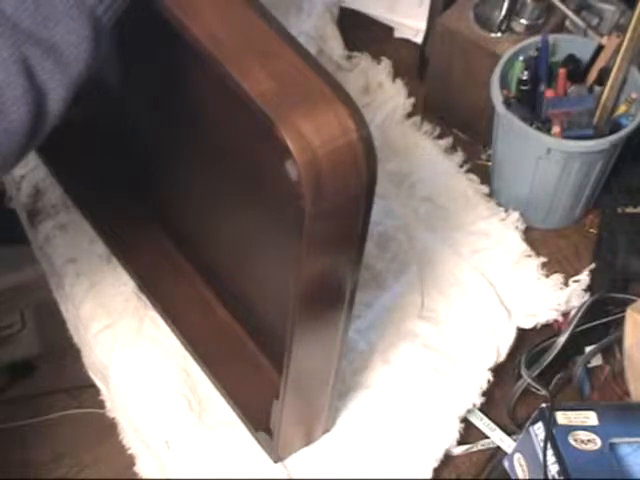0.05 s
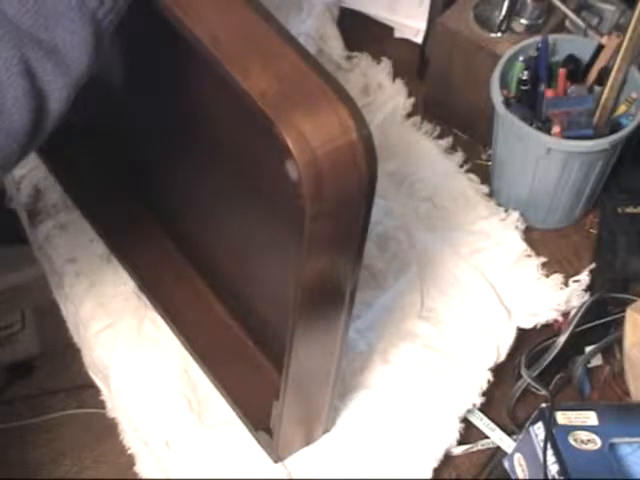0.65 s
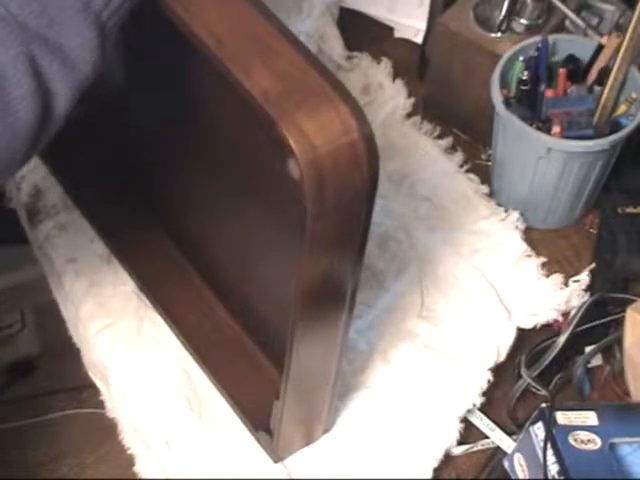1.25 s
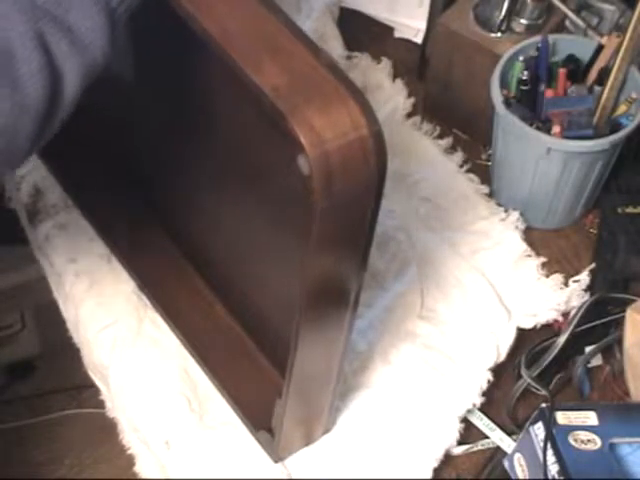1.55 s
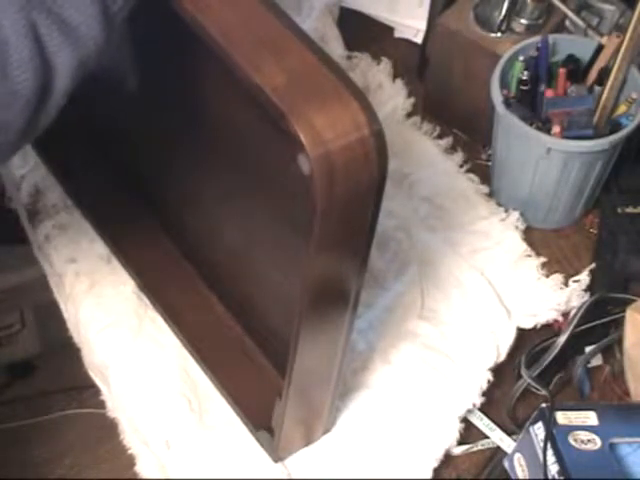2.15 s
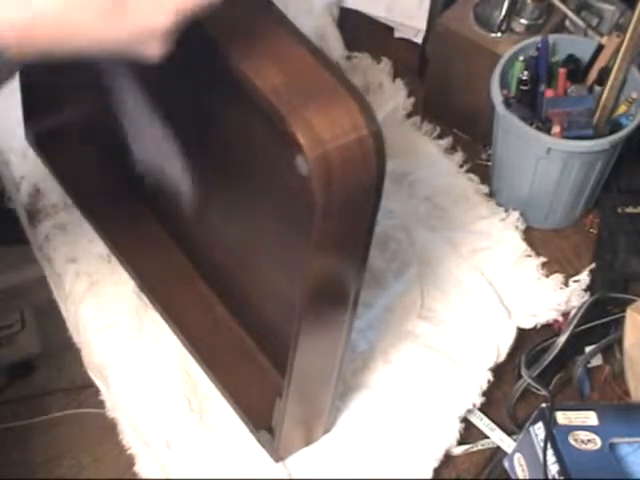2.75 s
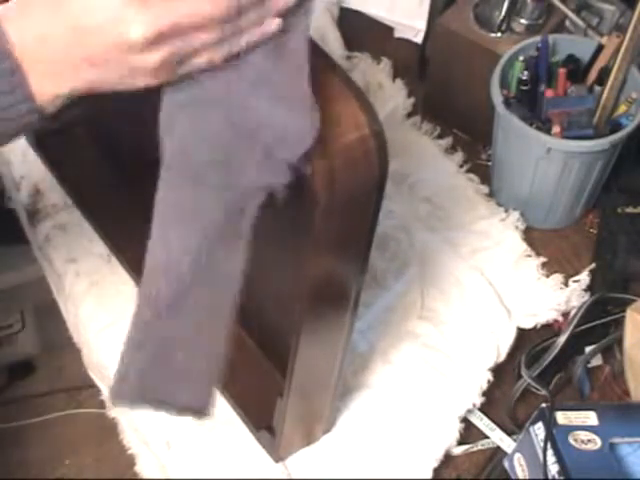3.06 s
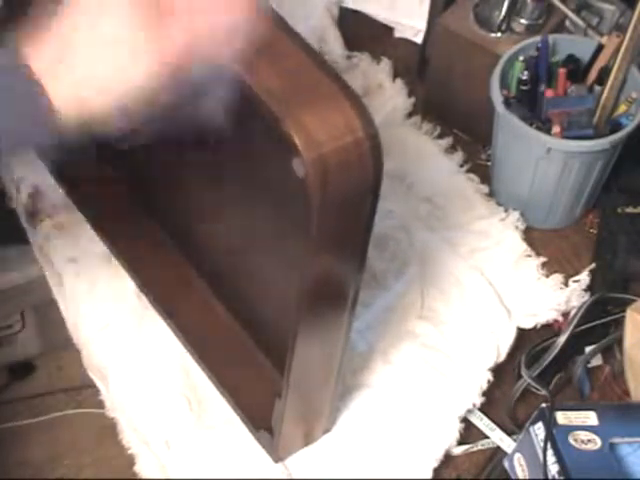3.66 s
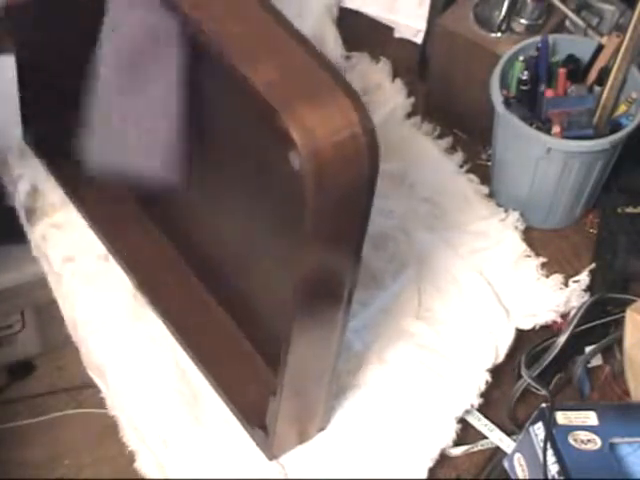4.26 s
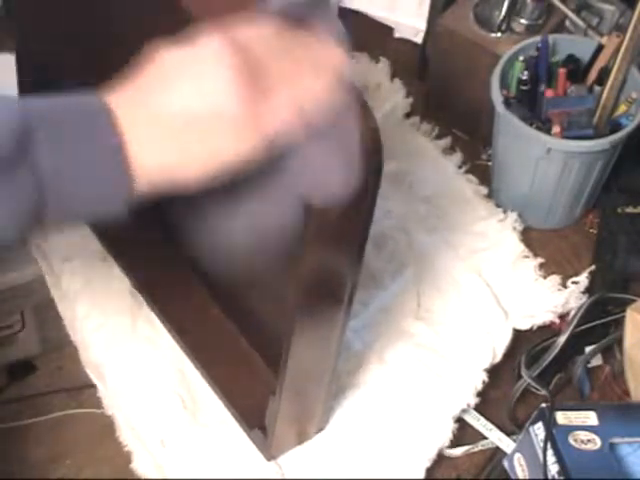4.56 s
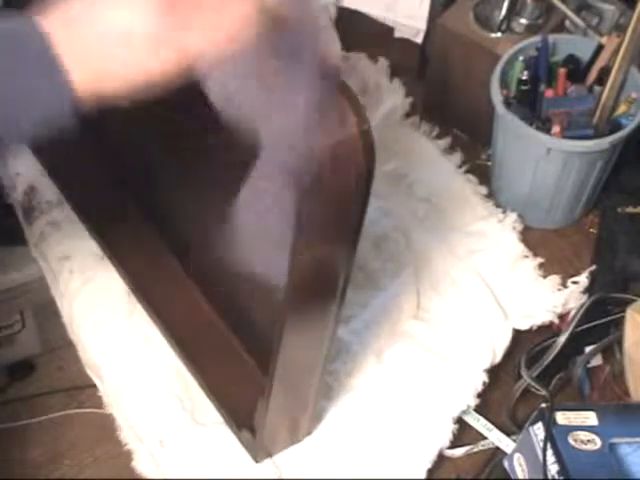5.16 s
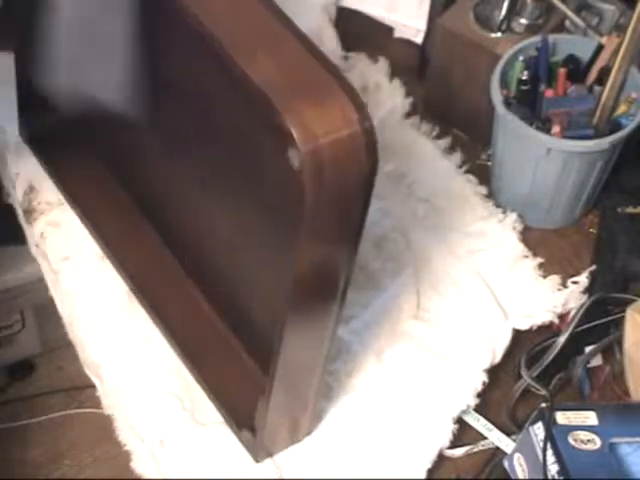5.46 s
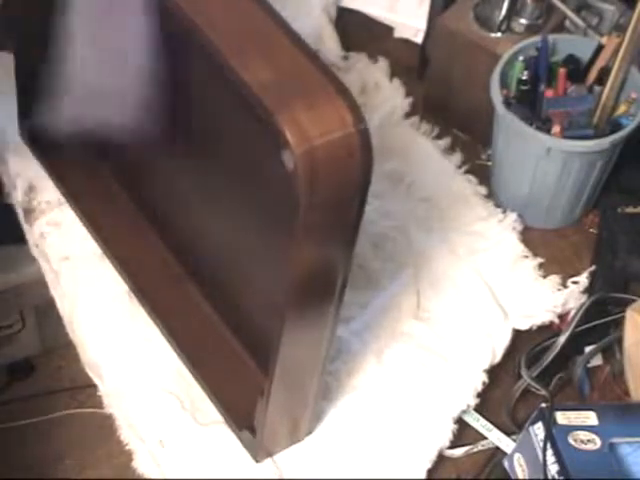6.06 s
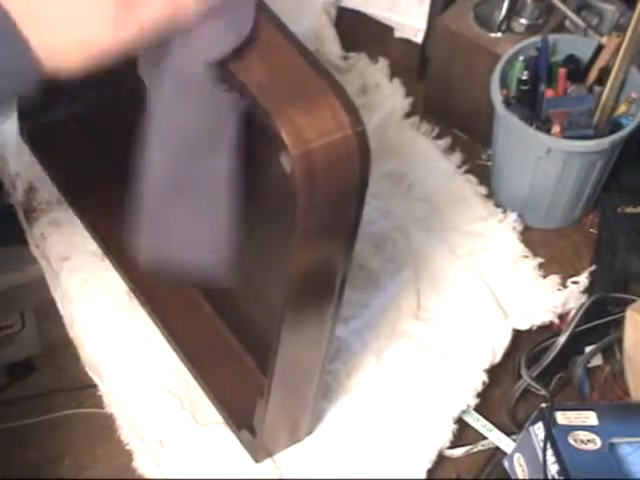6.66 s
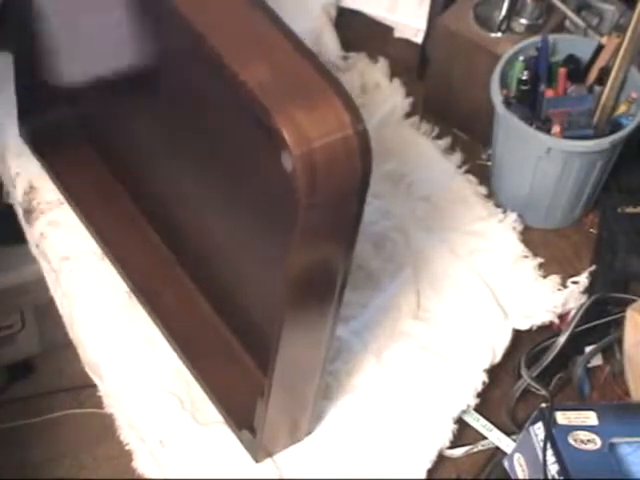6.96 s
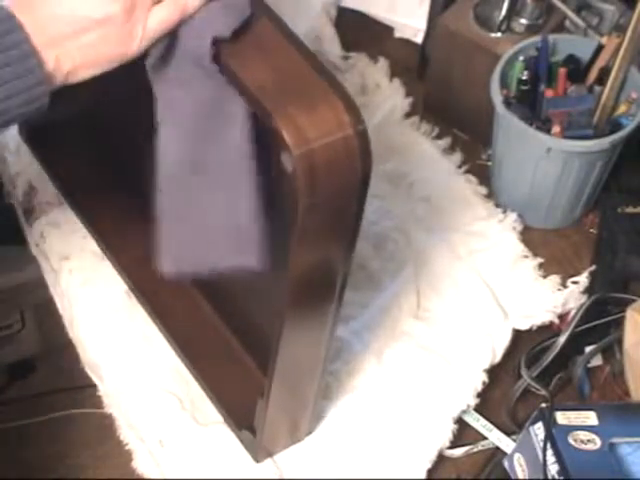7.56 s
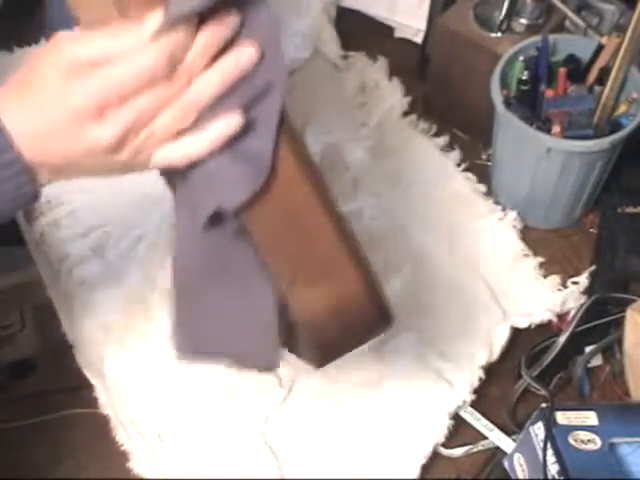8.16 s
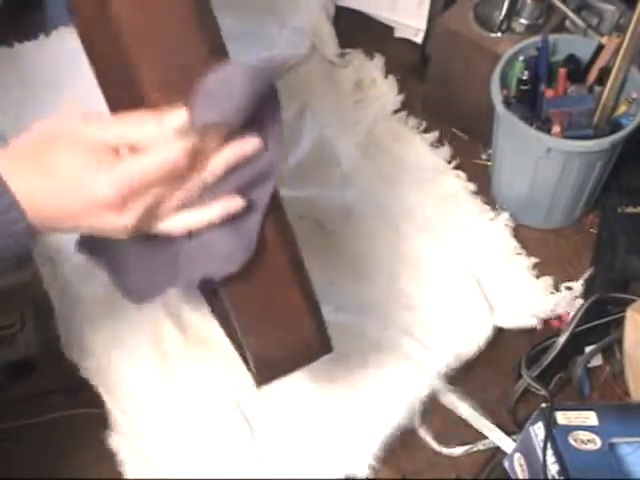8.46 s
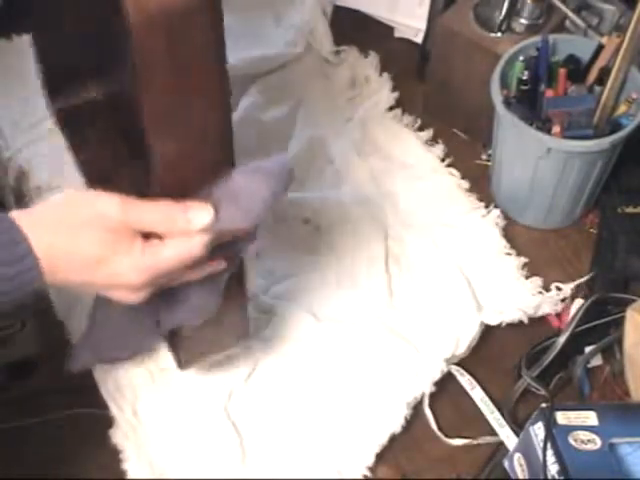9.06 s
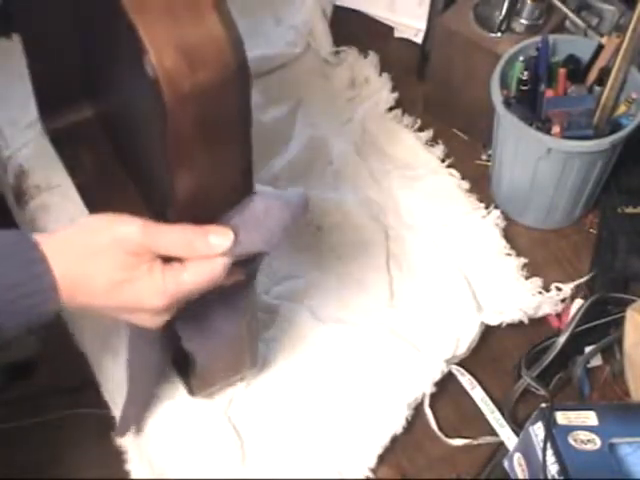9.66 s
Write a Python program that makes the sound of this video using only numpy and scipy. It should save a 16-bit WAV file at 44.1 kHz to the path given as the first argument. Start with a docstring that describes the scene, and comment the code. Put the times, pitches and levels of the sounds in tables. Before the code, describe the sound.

In a small workshop with a steady low motor hum, polish is sprayed twice close to the microphone. A wooden case knocks, then quiet, slightly squeaky cloth strokes rub its varnish. One heavy padded thud comes midway through the wiping. Near the end a short scrape leads to two more thuds, each leaving a deep fading rumble as the microphone stand shakes, and the soft wiping resumes.

```python
"""Polishing a wooden cabinet.

On a cloth-covered workbench, a pump nozzle squirts polish twice and a rag wipes to and fro, squeaking.
The case rings under light knocks, scrapes as it is tipped and lands in three heavy thuds.
Each thud sets the microphone stand swaying; thin, high tones flicker just after the second.
A motor hums underneath, in a small workshop."""
import sys
import numpy as np
from scipy import signal
from scipy.fft import rfft, irfft, next_fast_len
from scipy.io import wavfile

SR = 44100
rng = np.random.default_rng(int(sys.argv[2]) if len(sys.argv) > 2 else 0)


def put_to_file(sound):
    """Save the sound as 16-bit audio at rate SR, in the file named by the first command-line argument."""
    columns = np.atleast_2d(sound).T  # one column per channel
    safe = np.clip(columns, -1, 1)
    whole_steps = np.round(safe * 32767)
    wavfile.write(sys.argv[1], SR, whole_steps.astype(np.int16))


N = 436590
TIME = np.arange(N) / SR

# motor partials: f/Hz, rms level/dB
MOTOR_PARTIALS = [(75.1, -42.5), (179.5, -55.5), (300, -66), (377, -67.5), (528, -74.5), (744, -73),
                  (797, -82)]
# room noise spectra: f/Hz, relative level/dB
RUMBLE_SPECTRUM = [(15, -12), (29, 2), (42, -0.5), (70, -7), (110, -8), (170, -11), (240, -15.5),
                   (330, -38.5)]
AIR_SPECTRUM = [(260, -0.5), (380, 0.5), (520, -9), (760, -8.5), (1000, -10), (1500, -13.5), (3000, -17),
                (5000, -18.5), (8500, -29), (12000, -25.5), (15500, -24)]
# wiping arm rocks the stand: t/s, sway/dB
ARM_NUDGES = [(3.198, -41), (4.249, -31), (6.299, -41.5), (7.298, -37.5)]
# thin, high flickering tones: centre t/s, f/Hz, level/dB, length/s
FLICKER_TONES = [(8.51, 11700, -52.5, 0.082), (8.545, 12400, -53, 0.031), (8.588, 4000, -48, 0.036),
                 (8.597, 11500, -56, .018), (8.604, 2850, -44, .022), (8.662, 5300, -53.5, 0.017)]
# cloth friction spectrum: f/Hz, relative level/dB
RAG_SPECTRUM = [(150, 12), (400, -1.5), (800, -3), (1250, -2), (2200, -0.5), (2900, -3), (4200, -3),
                (6000, -2), (7500, -6), (9000, -15), (12000, -11), (16000, -21)]
# rag strokes: t/s, length/s, level/dB, share of stroke before top speed
RAG_STROKES = [(3.2, 0.44, -59, 0.6), (3.612, 0.21, -50.5, 0.78), (4.094, 0.27, -54.5, 0.4),
               (4.295, 0.52, -51.5, 0.33), (5.076, 0.58, -51, 0), (5.599, 0.38, -52.5, 0),
               (5.907, 0.22, -51.5, 0.44), (6.078, 0.2, -52.5, .75), (6.288, 0.41, -53, 0.03),
               (6.7, 0.37, -51, 0.6), (7.04, 0.51, -53, 0.4), (7.59, 0.095, -55.5, 0.64),
               (7.762, 0.35, -52, 0.2), (9.23, 0.47, -59, 0), (9.615, 0.47, -54.5, .75)]
# varnish squeaks: f/Hz, width/Hz, level/dB re rub
VARNISH_SQUEAKS = [(1262, 35, -15.5), (2910, 260, -11.5)]
# rag catches, lower squeak swells: t/s, swell/dB
RAG_CATCHES = [(3.74, 6), (5.66, 12), (6.49, 5), (7.22, 11), (7.32, 11)]
# nozzle tones: f/Hz, level/dB
NOZZLE_TONES = [(4000, -43), (5950, -40)]
# spray pulses: full flow t/s, rise/s, hold/s, fall/(dB/s), shut-off/s, mist/dB, spatter/dB
SPRAY_PULSES = [(.482, 0.0013, 0.11, 115, 0.01, -27.5, -33.5),
                (0.69, 0.0026, 0.068, 10, 0.0092, -42, -47.5),
                (0.73, 0.0071, 0.0082, 198, 0.0055, -37, -28)]
# fine and coarse drop spectra: f/Hz, relative level/dB
MIST_SPECTRUM = [(1000, -27), (3000, -27), (5000, -2.5), (6900, 4.5), (7900, -3), (9800, -0.5), (11000, -2),
                 (13000, -12), (16000, -26)]
SPATTER_SPECTRUM = [(100, -13), (250, -0.5), (900, 3), (1800, 1.5), (3000, 0), (5000, -13), (9000, -22)]
# resonances of the dragged case: f/Hz, width/Hz, relative level/dB
SCRAPE_MODES = [(414, 39, 12), (356, 100, 7), (680, 210, -1.5), (1370, 720, -11.5), (2450, 480, -15)]
# hard contacts and spitting drops: t/s, peak/dB, centre f/Hz
DRY_CLICKS = [(.487, -13, 6400), (.497, -14.5, 6500), (.668, -34, 5000), (.906, -39, 2940),
              (4.0494, -29, 1930)]
# case modes: f/Hz, relative level/dB, t60/s
WOOD_MODES = [(65, -22, 0.42), (117.3, 0, 0.26), (159, -0.5, 0.084), (203, 11, 0.089), (244, 5, 0.046),
              (329.5, -7.5, 0.093), (373.5, 4, 0.096), (433, -12.5, 0.08), (530, -30, 0.11),
              (600, -14, 0.084), (731, -6.5, 0.054), (771, -10, 0.092), (876, -2, 0.054), (1128, 0, 0.05),
              (1177, -25, .13), (1338, -21.5, 0.13), (1420, -12, 0.057), (1626, -14, 0.13),
              (2110, -31, 0.099)]
# dense panel modes, room included: f/Hz, relative spectral density/dB, t60/s
PANEL_SPECTRUM = [(149, 23, 0.25), (390, 10, 0.15), (720, 0.5, 0.11), (1360, -1.5, 0.24), (2550, -7, 0.24),
                  (4130, -6.5, 0.43), (6960, -6, 0.46), (12000, -15, 0.22), (15900, -15.5, 0.35)]
# light knocks of hand and case: t/s, level/dB, low cut/Hz, high cut/Hz
LIGHT_KNOCKS = [(.653, -48.5, 249, 5000), (.676, -35, 247, 4000), (1.7414, -18.5, 85, 450),
                (1.743, -32.5, 616, 2250), (1.754, -23.5, 192, 716), (1.885, -49.5, 1600, 1250),
                (1.894, -41, 130, 168), (2.003, -46.5, 139, 302), (2.446, -49, 960, 6400),
                (2.453, -45, 189, 240), (3.256, -48.5, 150, 280), (3.398, -54.5, 950, 1210),
                (3.930, -46, 503, 564), (4.056, -30.5, 119, 258), (4.061, -35, 402, 490),
                (4.201, -51.5, 398, 1200), (4.366, -43, 60, 109), (4.703, -39, 960, 1090),
                (4.712, -42, 525, 547), (5.926, -46.5, 865, 1800), (6.339, -44.5, 129, 406),
                (6.791, -38, 356, 377), (8.003, -41, 400, 1400), (8.200, -44.5, 500, 2000)]
# edge touch, strike, rebound per landing: delay/s, level/dB re strike, low cut/Hz, high cut ratio
LANDING_CONTACTS = [(.003, -9.5, 260, 0.89), (.0095, 0.5, 217, 1), (.022, -7.5, 270, .8)]
# case lands on padding: t/s, bounce/dB, bounce f/Hz, strike/dB, strike high cut/Hz, crack/dB, sway/dB
CASE_LANDINGS = [(5.174, -2, 124, -15, 1900, -8.5, -21.5), (8.431, -2.5, 125, -14.5, 1850, -12, -24),
                 (9.2966, -1, 158, -14.5, 1597, -12, -27.5)]


def undb(db):
    """Decibels to gain."""
    return 10 ** (np.asarray(db) / 20)


def unit(x):
    """Scale to rms 1."""
    return x / np.sqrt(np.mean(x ** 2))


def add(track, at_s, sound):
    """Mix a sound in from at_s."""
    i = int(at_s * SR)
    track[i:i + len(sound)] += sound[:N - i]


def noise(spectrum, grain_db=0):
    """Coloured noise, rms 1; grain makes single particles stand out."""
    hz, db = np.transpose(spectrum)
    size = next_fast_len(N)
    f = np.maximum(np.fft.rfftfreq(size, 1 / SR), 1)
    gain = undb(np.interp(np.log(f), np.log(hz), db)) * np.minimum(f / hz[0], 1) ** 2
    particles = rng.standard_normal(size) * undb(grain_db * np.minimum(rng.standard_normal(size), 3))
    return unit(irfft(rfft(particles) * gain, size)[:N])


def wander(rate_hz):
    """Interpolated random values, spread near 1."""
    knots = rng.standard_normal(N // 20)
    return np.interp(TIME * rate_hz, np.arange(len(knots)), knots)


def cut(x, hz, kind, order=2):
    """Butterworth low-, high- or band-pass."""
    sos = signal.butter(order, np.clip(hz, 10, SR / 2 - 500), kind, fs=SR, output="sos")
    return signal.sosfilt(sos, x)


def resonate(x, hz, width_hz):
    """Two equal resonators in series, gain 1 at centre."""
    b, a = signal.iirpeak(hz, hz / width_hz, fs=SR)
    return signal.lfilter(b, a, signal.lfilter(b, a, x))


def fade(t, t60_s):
    """Exponential decay."""
    return np.exp(-np.log(1000) * t / t60_s)


def workshop(rumble_db=-48.5, air_db=-56.5, waver_db=1.0):
    """Motor hum over low rumble and faint hiss."""
    hum = np.zeros(N)
    for hz, db in MOTOR_PARTIALS:
        amplitude = np.sqrt(2) * undb(db + waver_db * wander(2.7))
        hum += amplitude * np.sin(2 * np.pi * (hz * TIME + rng.random()))
    return hum + undb(rumble_db) * noise(RUMBLE_SPECTRUM) + undb(air_db) * noise(AIR_SPECTRUM)


def room(x, wet_db=-15, t60_s=0.28, band_hz=(250, 7000)):
    """Add the short reflections of a cluttered room."""
    t = TIME[:SR // 2]
    tail = cut(rng.standard_normal(len(t)), band_hz, "bandpass", order=1) * fade(t, t60_s) * (t > .008)
    return x + undb(wet_db) * signal.fftconvolve(x, tail / np.linalg.norm(tail))[:N]


def stand(sway_hz=28.93, build_s=0.31, t60_s=1.37):
    """The bench feeds the stand's wobble, which builds and dies away."""
    out, t = np.zeros(N), TIME[:2 * SR]
    swell = (1 - np.exp(-t / build_s)) ** 2 * fade(t, t60_s)
    sway = swell / swell.max() * np.sin(2 * np.pi * sway_hz * t)
    for at_s, *_, db in CASE_LANDINGS + ARM_NUDGES:
        add(out, at_s, undb(db) * sway)
    return out


def flicker(half_width=0.11):
    """Thin, high tones flicker just after the second thud, each a narrow noise band."""
    out = np.zeros(N)
    for at_s, hz, db, length_s in FLICKER_TONES:
        size = int(length_s * SR)
        band_hz = [hz * (1 - half_width), hz * (1 + half_width)]
        tone = cut(rng.standard_normal(SR // 2), band_hz, "bandpass")[-size:]
        add(out, at_s - length_s / 2, undb(db) * unit(tone) * np.hanning(size))
    return out


def wiping_gain(creep_db=-64, speed_power=.55):
    """Gain follows hand speed; until the second landing the rag also creeps between strokes."""
    creep_in = np.clip((TIME - RAG_STROKES[0][0]) * 10, 0, 1)
    gain = undb(creep_db) * creep_in * (TIME < CASE_LANDINGS[1][0])
    for at_s, length_s, db, share in RAG_STROKES:
        fastest_s = at_s + length_s * np.clip(share, .05, .95)
        speed = np.sin(np.pi / 2 * np.interp(TIME, [at_s, fastest_s, at_s + length_s], [0, 1, 0]))
        gain = np.maximum(gain, undb(db) * speed ** speed_power)
    return gain


def rag(grip_db=2.5, fold_db=1.0, fold_hz=3500, catch_s=0.023, squeak_spread_db=3):
    """Cloth on varnish: fibres hiss, and squeak as the grip comes and goes."""
    fibres = noise(RAG_SPECTRUM, grain_db=3)
    dull = cut(fibres, fold_hz, "lowpass", order=1)
    rub = dull + (fibres - dull) * undb(fold_db * wander(7.6))  # folds vary in brightness
    catch_db = sum(db * np.exp(-((TIME - at_s) / catch_s) ** 2) for at_s, db in RAG_CATCHES)
    for (hz, width_hz, db), swell_db in zip(VARNISH_SQUEAKS, [catch_db, 0]):
        squeak = resonate(rng.standard_normal(N), hz, 2 * width_hz)
        rub += undb(db + swell_db) * unit(squeak * undb(squeak_spread_db * wander(9.5)))
    return wiping_gain() * rub * undb(grip_db * wander(30))


def whistle(at_s=.674, length_s=0.027):
    """Air pipes through the nozzle ahead of the second squirt."""
    swell = np.sin(np.pi * np.clip((TIME - at_s) / length_s, 0, 1)) ** 2
    return swell * sum(undb(db) * np.sin(2 * np.pi * hz * TIME) for hz, db in NOZZLE_TONES)


def spray(sputter_db=2):
    """Pump nozzle: mist hisses and coarse drops spatter as the pressure falls."""
    mist, spatter = np.zeros(N), np.zeros(N)
    for at_s, rise_s, hold_s, fall_db_per_s, shut_s, mist_db, spatter_db in SPRAY_PULSES:
        t = TIME - at_s
        valve = np.exp(np.maximum(np.minimum(t, 0) / rise_s - np.maximum(t - hold_s, 0) / shut_s, -20))
        flow = valve * undb(-fall_db_per_s * np.clip(t, 0, hold_s))
        mist += undb(mist_db) * flow
        spatter += undb(spatter_db) * flow
    mist *= noise(MIST_SPECTRUM, grain_db=8.0)
    spatter *= noise(SPATTER_SPECTRUM, grain_db=4.5)
    return (mist + spatter) * undb(sputter_db * wander(350))


def scrape(at_s=7.878, hold_s=0.044, level_db=-31.5, rise_db_per_s=297, fall_db_per_s=187,
           slip_hz=210, jitter=.17, grit_db=-9, judder_hz=38, judder_db=3.0):
    """An edge of the tipped case sticks and slips; each slip rings the panels."""
    t = TIME - at_s
    cycles = np.cumsum(slip_hz * np.exp(jitter * wander(150))) / SR
    slips = np.diff(np.floor(cycles), prepend=0) * rng.uniform(0.23, 1, N)
    force = unit(slips) + undb(grit_db) * rng.standard_normal(N)
    body = sum(undb(db) * resonate(force, hz, width_hz) for hz, width_hz, db in SCRAPE_MODES)
    judder = undb(judder_db * np.cos(2 * np.pi * judder_hz * t))
    push_db = rise_db_per_s * np.minimum(t, 0) - fall_db_per_s * np.maximum(t - hold_s, 0)
    return unit(body) * judder * undb(level_db + push_db)


def clicks(t60_s=.016, band_ratio=1.98, delay_s=.0122, crack_hz=1200, snap_hz=5100, snap_db=-13.5):
    """Dry clicks of contacts and drops; a crack and snap as each landing bottoms out the padding."""
    out, t = np.zeros(N), TIME[:SR // 20]
    cracks = [(at_s + delay_s, crack_db + part_db, hz) for at_s, *_, crack_db, _ in CASE_LANDINGS
              for hz, part_db in [(crack_hz, 0), (snap_hz, snap_db)]]
    for at_s, db, hz in DRY_CLICKS + cracks:
        burst = rng.standard_normal(len(t)) * fade(t, t60_s)
        click = cut(burst, [hz / band_ratio, hz * band_ratio], "bandpass", order=3)
        add(out, at_s, undb(db) * click / np.abs(click).max())
    return out


def case_modes(t, build_s=0.0035):
    """Damped sines, one row a mode; neighbours move the panel in opposite senses."""
    modes = np.array([undb(db) * np.sin(2 * np.pi * hz * t) * fade(t, t60_s)
                      for hz, db, t60_s in WOOD_MODES])
    signs = (-1) ** np.arange(len(modes))[:, None]
    return modes * signs * (1 - np.exp(-t / build_s))


def panel_bands(t):
    """Dense panel modes as half-octave noise bands and their decays."""
    hz, db, t60_s = np.transpose(PANEL_SPECTRUM)
    bands, decays = [], []
    for centre_hz in 177 * 2 ** (np.arange(14) / 2):
        band_hz = [centre_hz / 2 ** .25, centre_hz * 2 ** .25]
        bands.append(cut(rng.standard_normal(2 * SR), band_hz, "bandpass", order=3))
        band_db, band_t60_s = (np.interp(np.log(centre_hz), np.log(hz), col) for col in (db, t60_s))
        decays.append(undb(band_db) * fade(t, band_t60_s))
    return np.array(bands), np.array(decays)


def knocks(panel_db=-3, crack_db=3, crack_t60_s=0.11, spot_db=2.5, press_s=0.00038, soft_hz=1270):
    """Knocks and landing contacts ring the wood; sharper contacts ring brighter."""
    out, t, attack = np.zeros(N), TIME[:SR // 2], slice(SR // 33)
    modes = case_modes(t)
    bands, decays = panel_bands(t)
    contacts = [(at_s + delay_s, strike_db + db, low_hz, high_hz * ratio)
                for at_s, _, _, strike_db, high_hz, _, _ in CASE_LANDINGS
                for delay_s, db, low_hz, ratio in LANDING_CONTACTS]
    for at_s, db, low_hz, high_hz in LIGHT_KNOCKS + contacts:
        start = rng.integers(SR)
        panels = np.sum(bands[:, start:start + len(t)] * decays, axis=0)
        panels = panels / np.std(panels[attack]) * (1 + undb(crack_db) * fade(t, crack_t60_s))
        spot_gains = undb(spot_db * rng.standard_normal(len(modes)))  # each spot favours other modes
        ring = (spot_gains @ modes + undb(panel_db) * panels) * (1 - np.exp(-t / press_s))
        ring = cut(ring, low_hz, "highpass", order=3)
        # hand or padding: steeper treble loss
        knock = cut(ring, high_hz, "lowpass", order=4 if high_hz < soft_hz else 2)
        add(out, at_s, undb(db) * knock / np.std(knock[attack]))
    return out


def thuds(bounce_cycles=1.5, shake_db=-7):
    """The case bounces on the padding, shaking its low modes."""
    out, t = np.zeros(N), TIME[:SR // 2]
    ring = case_modes(t).sum(0)
    for at_s, db, hz, *_ in CASE_LANDINGS:
        window = np.sin(np.pi * np.minimum(t * hz / bounce_cycles, 1)) ** 2
        bounce = -np.sin(2 * np.pi * hz * t) * window
        shake = signal.fftconvolve(ring, bounce)[:len(t)]
        add(out, at_s, undb(db) * (bounce + undb(shake_db) * shake / np.abs(shake).max()))
    return out


def scene(side_db=-51):
    """All sources centred; only faint rumble and hiss in the side signal."""
    work = thuds() + knocks() + clicks() + flicker() + spray() + whistle() + rag() + scrape()
    mid = room(work) + stand() + workshop()
    side = undb(side_db) * noise([(20, 0), (55, -7.5), (150, -19.5), (500, -41),
                                  (3000, -46.5), (15000, -49)])
    return np.array([mid + side, mid - side])


def record(dry, top_hz=15750):
    """Clip at full scale, then low-pass steeply."""
    return signal.sosfilt(signal.ellip(10, .1, 90, top_hz, fs=SR, output="sos"), np.clip(dry, -1, 1))


dry = scene()
out = record(dry)
put_to_file(out)
```